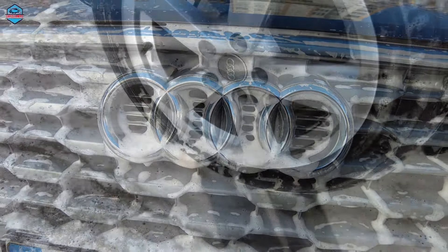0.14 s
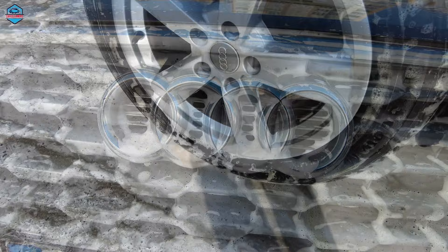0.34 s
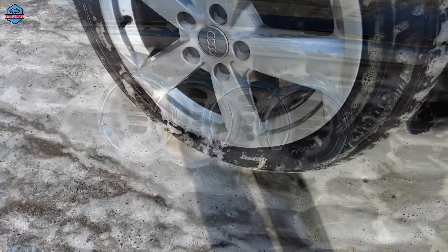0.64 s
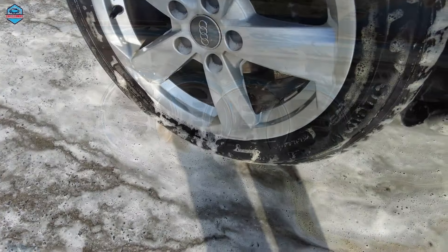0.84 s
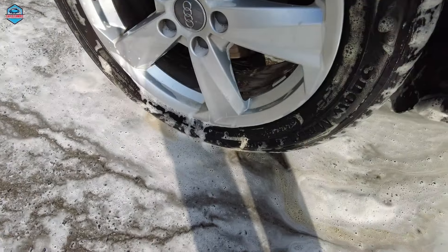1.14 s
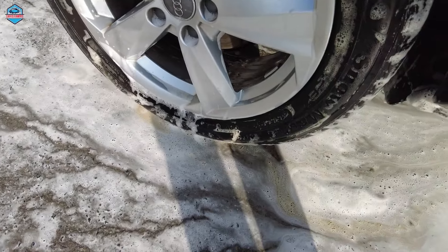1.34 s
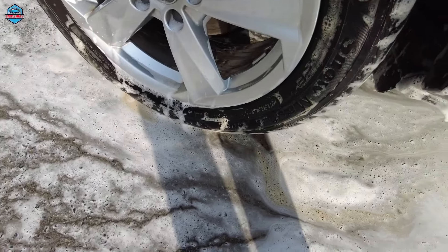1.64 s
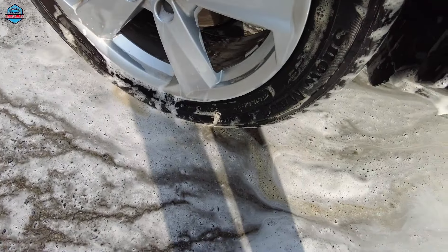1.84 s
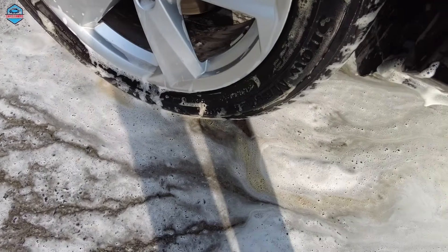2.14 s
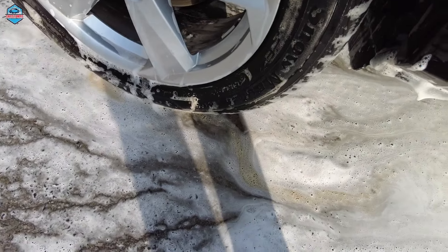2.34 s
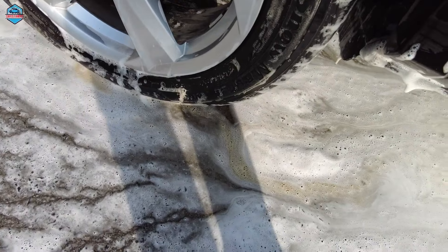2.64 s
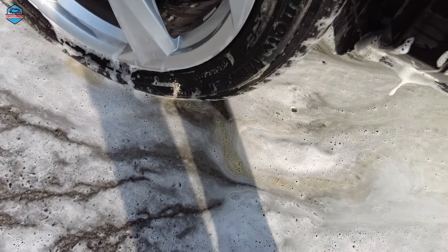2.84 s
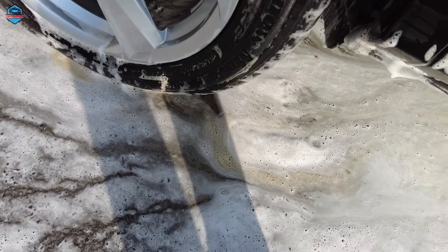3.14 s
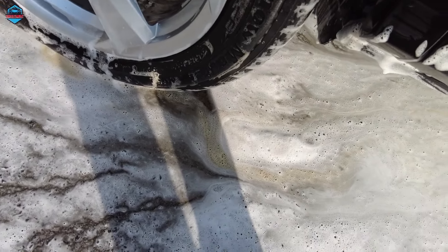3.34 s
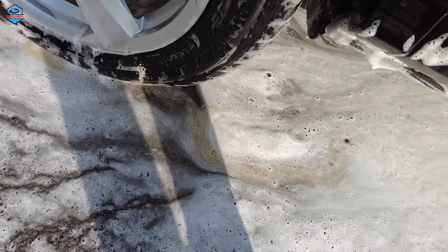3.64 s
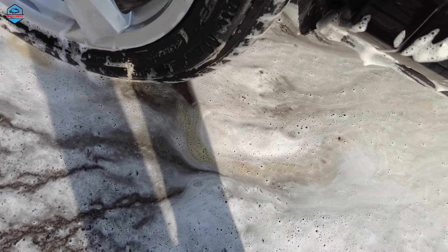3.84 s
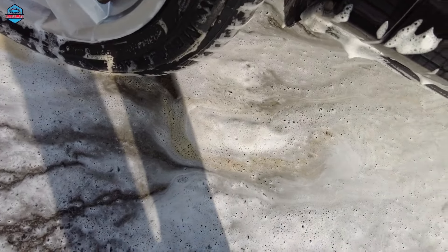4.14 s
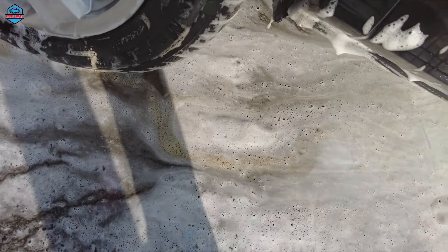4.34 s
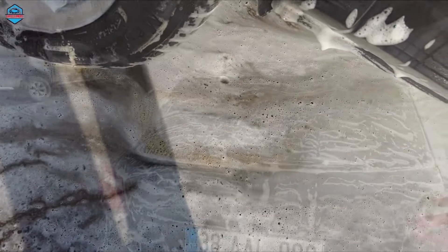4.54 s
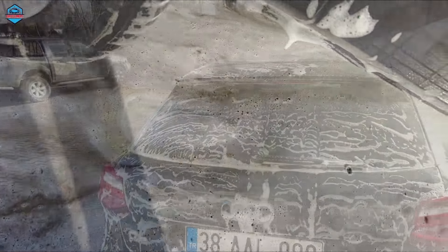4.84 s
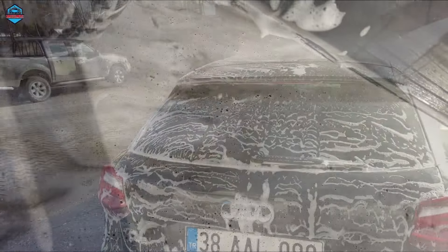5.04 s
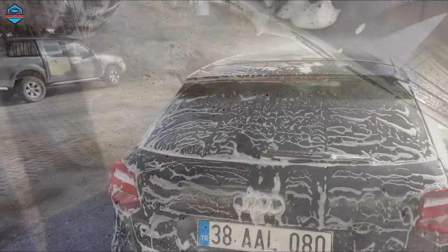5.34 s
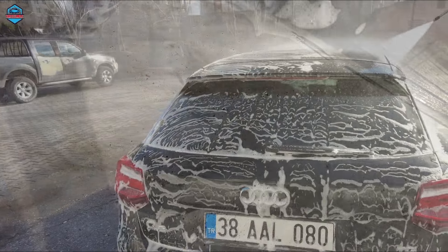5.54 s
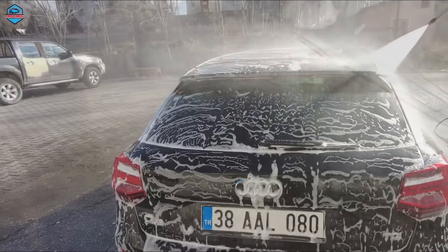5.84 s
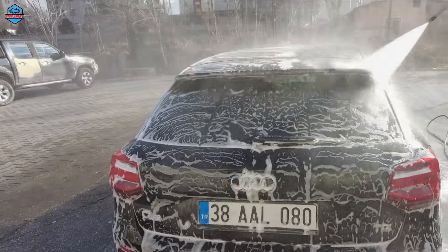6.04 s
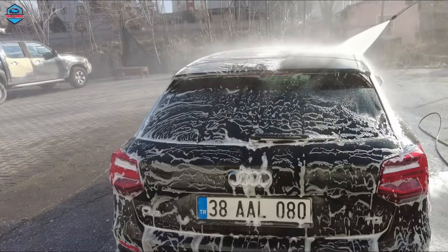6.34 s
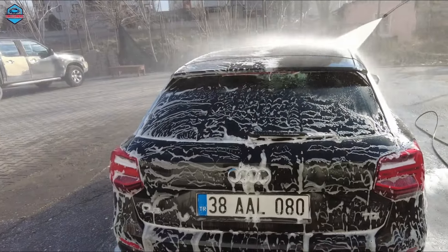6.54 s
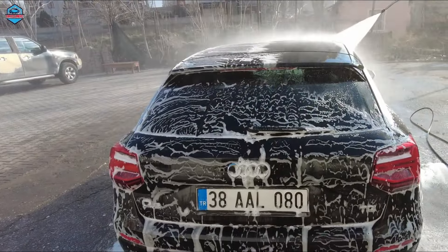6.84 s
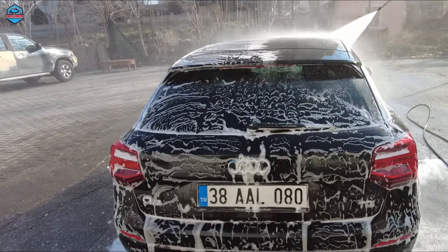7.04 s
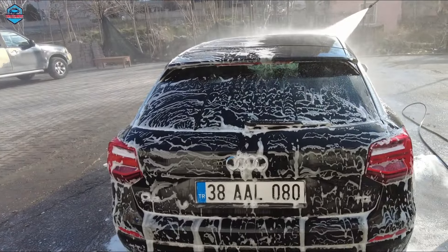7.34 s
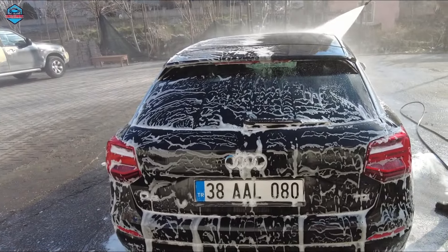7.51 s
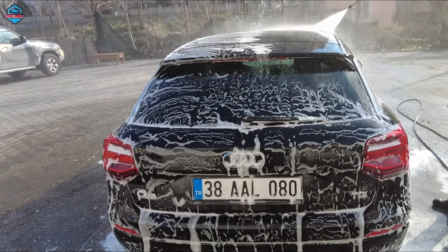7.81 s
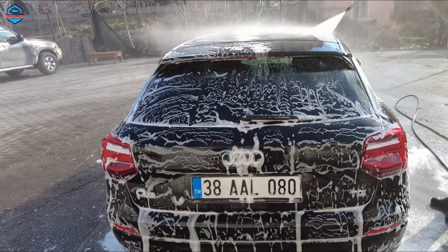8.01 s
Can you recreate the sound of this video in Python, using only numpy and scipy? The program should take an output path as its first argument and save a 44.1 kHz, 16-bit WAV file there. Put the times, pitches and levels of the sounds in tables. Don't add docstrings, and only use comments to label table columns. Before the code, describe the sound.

For the first 0.15 seconds there is only quiet open-yard air with a faint low rumble. After a tiny gap, at about 0.18, a close pressure-washer jet bursts in, growing to a loud, broad, slightly left-leaning hiss by 0.85, with low pump hum and throb beneath. Nearby surfaces give it a shifting hollow colour. A faint far motor sags in pitch from 1.4 to 2.1. The jet eases slightly until about 4, then swells strongly from 4.4 to 5; wind slaps thump softly near 0.9 and 4, and cluster around 4.8 to 5.15. At 5.17 it cuts off. From 5.21 a much quieter, thinner jet sounds farther away, right of centre. It rises to a short surge from 5.9 to 6.3, drumming on the roof panel, then drops to a soft steady spray. A light wind puff arrives near 7.9, with mistier treble at the end, about 8.2.

```python
import sys
import numpy as np
from scipy import signal
from scipy.io import wavfile
from scipy.ndimage import uniform_filter1d

SR = 44100
rng = np.random.default_rng(int(sys.argv[2]) if len(sys.argv) > 2 else 0)


def to_linear_factor(level_db):
    exponent = np.asarray(level_db, float) / 20
    return 10 ** exponent


def pcm_store(signal):
    levels = np.round(np.clip(np.atleast_2d(signal), -1, 1) * 32767)
    wavfile.write(sys.argv[1], SR, levels.astype(np.int16).T)


N = 360297
SIZE, HOP = 1024, 256
HZ = np.fft.rfftfreq(SIZE, 1 / SR)[:, None]
FRAME_S = np.arange(N // HOP + 5) * HOP / SR
TIME = np.arange(N) / SR
PUMP_HZ = 73.6

# [level/dB rms, follow/dB per dB of jet, turn/dB per unit of bearing]
PUMP_ORDERS = [
    [(-56, 0.5, -26), (-60, 2.5, 6), (-68.5, 2.5, 4)],
    [(-77, 1.5, 0.1), (-75.5, 0.6, -10), (-75, 1.6, -6)],
]
# [t/s, peak/dB, f/Hz]
SLAPS = [(.945, -32, 55), (3.987, -31, 45), (4.84, -29, 65), (4.875, -32, 100), (5.095, -29, 70),
         (5.13, -33, 110), (5.15, -30, 55), (6.05, -41, 80), (6.105, -39, 170), (6.17, -42, 80),
         (7.903, -49, 70), (8.018, -44, 60)]


def evened(x):
    return x / np.sqrt(np.mean(x ** 2) + 1e-20)


def read(points):
    f, value = np.transpose(points)
    return np.interp(np.log(HZ + 1), np.log(f + 1), value)


def curves(rows, t):
    s, *columns = np.transpose(rows)
    return [np.interp(t, s, c) for c in columns]


def dwell(t, s, half_s):
    return np.exp(-((t - s) / half_s) ** 2)


def bump(hz, width_hz):
    return np.exp(-((HZ - hz) / width_hz) ** 2)


def in_band(colour, lo_hz, hi_hz):
    gain = to_linear_factor(read(colour))
    inside = (HZ > lo_hz) & (HZ < hi_hz)
    return gain / np.sqrt(np.sum(gain[inside] ** 2))


def patches(bins, frames):
    field = rng.standard_normal((len(FRAME_S), len(HZ))).T
    field = uniform_filter1d(field, bins, axis=0)
    return evened(uniform_filter1d(field, frames, axis=1))


def ports(gain, same, turn=0, lean_db=0, paths=1):
    a, b, c, d = rng.standard_normal((len(FRAME_S), len(HZ), 4)).T
    same = np.clip(same, -1, 1)
    left = a + 1j * b
    right = same * left + np.sqrt(1 - same ** 2) * (c + 1j * d)
    right = right * np.exp(-1j * turn)
    both = np.array([left * to_linear_factor(lean_db / 2), right * to_linear_factor(-lean_db / 2)])
    z = np.sqrt(3 / 2) * gain * paths * both
    return signal.istft(z, nperseg=SIZE, noverlap=SIZE - HOP)[1][:, :N]


def yard():
    # [f/Hz, density/dB per Hz]
    yard_colour = [(15, -34), (25, -5), (49, -10.5), (135, -19), (207, -29), (237, -42), (318, -31.5),
                   (543, -35), (1420, -37.5), (2070, -48.5), (15000, -79.5)]
    # [f/Hz, likeness/0-1]
    yard_same = [(60, 1.0), (950, 0.98), (15000, 0.47)]
    return ports(in_band(yard_colour, 20, 16000) * to_linear_factor(-45.5), read(yard_same))


def housing():
    # [f/Hz, width/Hz, level/dB]
    resonances = [(1300, 65, 0.5), (1710, 140, 2.5), (2980, 300, 4.5), (3690, 63, -4), (4290, 270, 3),
                  (6130, 460, 1), (7030, 320, -2), (7840, 280, 4.5), (9340, 230, 6.5), (10950, 290, 3)]
    return sum(db * bump(hz, width_hz) for hz, width_hz, db in resonances)


def hollows(rows):
    return sum(db * dwell(FRAME_S, s, half_s) * bump(hz, 45 + .08 * hz) for s, half_s, hz, db in rows)


def echoes(mirrors, bearing, scale, small_hz, dull_hz):
    paths = 1
    mirror = scale * np.exp(-HZ / dull_hz) / (1 + (small_hz / (HZ + 1)) ** 2)
    for rows, skew_ms, turn_ms in mirrors:
        left_ms, strength = curves(rows, FRAME_S)
        right_ms = left_ms + skew_ms + turn_ms * (1 - bearing)
        delay_s = np.array([left_ms, right_ms])[:, None] / 1000
        paths = paths + strength * mirror * np.exp(-2j * np.pi * HZ * delay_s)
    return paths


def spray(rows, mirrors, jet, panel, lean, same, shape_db, panel_db, fizz_share, lean_db, patchy_db, sway_db,
          gain_db):
    # [t/s, half length/s, drumming level/dB, extra jet body/dB]
    passes = [(1.4, 0.26, -42.5, 1), (3.534, 0.29, -45, -0.5), (4.03, 0.2, -43.5, -1),
              (5.1, 0.072, -37.5, 1), (5.92, 0.046, -40.5, -1.5), (6.1, .06, -40, 3.5),
              (6.123, 0.29, -40, 2), (6.324, .045, -39.5, 0.1), (8.145, 0.065, -48.5, 2.5)]
    # [f/Hz, level/dB]
    boom_colour = [(60, -53), (110, -11), (150, 1.5), (280, 0.5), (380, -28)]
    # [f/Hz, phase/radians]
    port_turn = [(80, 0.18), (400, 1.6), (1100, 3.8), (1290, .4), (2000, 0.95), (4000, 2.64), (15000, 2.8)]
    level_db, mist_db, bearing = curves(rows, FRAME_S)

    body_db = sum(db * dwell(FRAME_S, s, half_s) for s, half_s, _, db in passes)
    mist_db = mist_db - mist_db.mean()
    fizz = read([(2000, 0), (3000, 1), (6000, 1), (8000, 0)]) * (fizz_share * mist_db - body_db)
    mist = read([(6000, 0), (8000, 1)]) * (mist_db - body_db)
    hiss = in_band(jet, 1000, 2740) * to_linear_factor(level_db + body_db + fizz + mist)

    pass_power = sum(to_linear_factor(db) ** 2 * dwell(FRAME_S, s, half_s) ** 2 for s, half_s, db, _ in passes)
    beat = np.sqrt(to_linear_factor(level_db + panel_db) ** 2 + pass_power)
    gust = np.max([dwell(FRAME_S, s, .06) for s, _, _ in SLAPS], axis=0)
    boom_db = -13.5 + 11 * gust
    drum = np.hypot(in_band(panel, 320, 900), in_band(boom_colour, 100, 330) * to_linear_factor(boom_db - 2.5))
    drum = drum * beat * to_linear_factor(1.53 * patches(bins=5, frames=8))

    patchy = patchy_db * patches(bins=5, frames=70)
    sway = sway_db * patches(bins=300, frames=14)
    gain = np.hypot(hiss, drum) * to_linear_factor(shape_db + patchy + sway)
    paths = echoes(mirrors, bearing, scale=1.5, small_hz=550, dull_hz=6000)
    balance_db = read(lean) + lean_db * (bearing - .5)
    sound = ports(gain, read(same), bearing * read(port_turn), balance_db, paths)
    throb = 1 + .02 * np.sin(2 * np.pi * PUMP_HZ * TIME)
    return to_linear_factor(gain_db) * sound * throb


def pump(orders, rows):
    held_s = np.clip(TIME, rows[0][0], rows[-1][0])
    level_db, _, bearing = (c - c.mean() for c in curves(rows, held_s))
    waver = evened(uniform_filter1d(rng.standard_normal(len(FRAME_S)), size=60))
    shaft_hz = PUMP_HZ + .25 * np.interp(TIME, FRAME_S, waver)
    turns = np.cumsum(shaft_hz) / SR
    hum = 0
    for order, (db, follow, turn_db) in enumerate(orders, 1):
        loudness = to_linear_factor(db + follow * level_db + turn_db * bearing)
        hum = hum + np.sqrt(2) * loudness * np.sin(2 * np.pi * order * turns)
    return hum


def near_lance():
    # [t/s, jet level/dB, fine mist/dB, bearing/-1 right to 1 left]
    near_path = [(.18, -43, 0.5, 0.93), (.5, -39, 0.5, 0.81), (.85, -35.5, -2, 0.95), (1.25, -35, -2, 0.72),
                 (1.6, -37, -1.4, 0.67), (2.5, -37, -2, 0.6), (3.25, -39, 1.5, 0.57),
                 (3.95, -39, -0.7, 0.5), (4.5, -32.5, 0.3, 0.31), (4.95, -33, 0.4, 0.42),
                 (5.17, -37, -0.5, 0.33)]
    # [f/Hz, density/dB per Hz]
    near_jet = [(600, -16.5), (850, -6), (1250, -1), (2400, -5), (4500, -5), (7000, -9), (9000, -10),
                (12300, -10.5), (14500, -15.5), (16000, -10)]
    # [f/Hz, density/dB per Hz]
    near_panel = [(200, -49), (290, -10.5), (370, -3), (610, -0.5), (850, 2), (1000, -1.5), (1300, -17)]
    # [f/Hz, level/dB]
    near_lean = [(60, -5), (110, -1), (200, 1), (380, 1), (700, 3.5), (1290, 1.5), (2380, 1.5), (4400, 2),
                 (8120, 7), (15000, 1.5)]
    # [f/Hz, likeness/0-1]
    near_same = [(150, .99), (550, .95), (800, .75), (1180, .55), (1300, .93), (2200, .78), (3000, .6),
                 (3600, .3), (8000, .25), (15000, .25)]
    # [t/s, half length/s, f/Hz, level/dB]
    near_hollows = [(0.498, 0.61, 780, -8), (.95, 0.23, 270, -4.5), (1.0, .15, 1150, 2),
                    (3.8, 0.37, 3180, -2), (4.65, .2, 2200, -0.5), (1.5, .35, 1100, -1),
                    (1.8, 0.16, 1360, 3), (2.0, 0.27, 1140, -3.5), (2.306, 0.4, 1410, -0.5),
                    (3.1, .3, 220, -3.5), (4.272, .17, 235, 7), (2.554, 0.72, 900, -8),
                    (2.657, 0.36, 6040, 7), (3.9, .2, 1200, -3.5), (4.05, 0.18, 910, 1.5),
                    (4.354, 0.072, 3350, 6.5), (4.6, 0.52, 1110, 6), (4.9, 0.42, 880, -11),
                    (4.9, 0.71, 4600, 3), (4.85, 0.29, 1510, 1.5), (2.6, 0.69, 590, 2.5),
                    (5.05, 0.14, 1300, 1.5), (5.123, 0.082, 390, 8.5), (5.13, 0.046, 735, -7)]
    # [t/s, delay/ms, strength/0-1]
    ground_echo = [(.5, 1.22, .4), (.85, 1.36, .24), (1.75, 2.08, .23), (2.7, 2.11, .23), (3.0, 2.3, .24),
                   (4.2, 2.55, .22), (4.45, 2.72, .26), (4.8, 2.55, .26), (5.19, 2.57, .2)]
    # [t/s, delay/ms, strength/0-1]
    wheel_echo = [(1.0, 1.91, .19), (1.3, 1.7, 0), (1.7, 1.62, .2), (2.8, 1.57, .13), (4.2, 1.6, .14),
                  (4.5, 1.5, 0), (4.85, 1.5, .1)]
    # [t/s, delay/ms, strength/0-1]
    sill_echo = [(.18, 3.0, .17), (1.2, 3.46, .18), (1.9, 3.58, .2), (2.7, 3.55, .08), (3.0, 3.4, 0),
                 (4.5, 3.0, 0), (4.85, 2.99, .16)]
    # [path, from full left/ms, turning right/ms per unit of bearing]
    near_mirrors = [(ground_echo, 0, .23), (wheel_echo, -.04, .02), (sill_echo, -.08, .25)]
    shape_db = hollows(near_hollows) + .5 * housing()
    jet = spray(near_path, near_mirrors, near_jet, near_panel, near_lean, near_same, shape_db, panel_db=-3.5,
                fizz_share=0.82, lean_db=3.0, patchy_db=1.64, sway_db=0.6, gain_db=0.5)
    return jet + pump(PUMP_ORDERS[0], near_path)


def wind():
    # [t/s, level/dB]
    wind_level = [
        (0.18, -54.5),
        (0.65, -53.5),
        (5.03, -53.5),
        (5.27, -71),
        (6.1, -68),
        (6.5, -69),
        (7.75, -67.5),
        (7.93, -56),
        (8.17, -59),
    ]
    # [f/Hz, level/dB]
    wind_colour = [(15, 0.5), (35, -3), (55, -2), (90, -11), (130, -8.5), (200, -31), (300, -60)]
    level_db = curves(wind_level, FRAME_S)[0] - 1.5 + 1.8 * patches(bins=40, frames=6)
    return ports(in_band(wind_colour, 20, 130) * to_linear_factor(level_db), 0.99)


def slaps():
    pressure = 0
    for s, db, hz in SLAPS:
        swing = np.cos(2 * np.pi * hz * (TIME - s))
        pressure = pressure - to_linear_factor(db) * dwell(TIME, s, .4 / hz) * swing
    return pressure


def engine():
    # [t/s, f/Hz, level/dB]
    sag = [
        (1.3, 126, -75),
        (1.5, 121, -57),
        (1.95, 116, -58),
        (2.15, 115, -90),
    ]
    hz, db = curves(sag, TIME)
    return to_linear_factor(db) * (TIME > sag[0][0]) * np.sin(2 * np.pi * np.cumsum(hz) / SR)


def far_lance():
    # [t/s, jet level/dB, fine mist/dB, bearing/-1 right to 1 left]
    far_path = [
        (5.21, -56, 1.5, -.57),
        (5.45, -54.5, -1.5, -0.46),
        (6.0, -46.5, -1.3, -0.32),
        (6.25, -46, -3, -0.24),
        (6.42, -50.5, -1.1, -0.32),
        (7.6, -54, -2.9, -0.4),
        (8.17, -53.5, 4.5, -0.22),
    ]
    # [f/Hz, density/dB per Hz]
    far_jet = [(600, -19), (850, -13.5), (1270, -4), (2000, -8.5), (4500, -8.5), (7000, -10.5), (9500, -11),
               (11300, -14), (13000, -16.5), (16000, -18)]
    # [f/Hz, density/dB per Hz]
    far_panel = [(200, -37), (300, -14), (370, -4), (520, -3), (700, -3.5), (950, -6), (1300, -20.5),
                 (1700, -27)]
    # [f/Hz, level/dB]
    far_lean = [(60, 0.0), (180, -1.5), (550, 0), (1650, 0.5), (4970, -2.5), (15000, -5)]
    # [f/Hz, likeness/0-1]
    far_same = [(150, .99), (800, .9), (1180, .65), (1300, .96), (2900, .82), (3700, .3), (4500, .65),
                (6000, .25), (7800, .55), (8600, .25), (9500, .65), (15000, .3)]
    # [t/s, half length/s, f/Hz, level/dB]
    far_hollows = [(5.6, 0.32, 1080, -3), (5.92, 0.066, 500, 4), (6.32, 0.056, 530, 3),
                   (5.5, .4, 2150, 2.5), (7, 0.43, 8800, 3.5)]
    # [t/s, delay/ms, strength/0-1]
    far_echo = [(5.2, 1.71, .2), (5.8, 1.77, .17), (6.4, 1.71, .22), (8.17, 1.78, .21)]
    # [path, from full left/ms, turning right/ms per unit of bearing]
    far_mirrors = [(far_echo, .01, 0)]
    shape_db = 0.7 * housing() + hollows(far_hollows)
    jet = spray(far_path, far_mirrors, far_jet, far_panel, far_lean, far_same, shape_db, panel_db=-1.5,
                fizz_share=1.0, lean_db=-2.0, patchy_db=1.0, sway_db=.5, gain_db=-0.02)
    return jet + pump(PUMP_ORDERS[1], far_path)


def scene():
    # [t/s, gain/dB]
    yard_cut = [(.1445, 0), (.1465, -45), (.163, -46), (.165, -100)]
    # [t/s, gain/dB]
    near_cut = [(.174, -100), (.176, -30), (.1785, 0), (5.1695, 0), (5.173, -25), (5.18, -40), (5.19, -100)]
    # [t/s, gain/dB]
    far_cut = [(5.205, -100), (5.2095, -35), (5.2112, 0)]

    def fade(rows):
        return to_linear_factor(curves(rows, TIME)[0])

    air = wind() + slaps() + engine()
    near = near_lance() + air
    far = far_lance() + air
    return yard() * fade(yard_cut) + near * fade(near_cut) + far * fade(far_cut)


def roll_off(x):
    return signal.sosfilt(signal.butter(12, 16950, fs=SR, output="sos"), x)


def record(dry):
    edge = signal.firwin(1023, 15740, window=("kaiser", 10), fs=SR)
    mix = signal.oaconvolve(dry, edge[None], "same")
    return roll_off(mix)


dry = scene()
out = record(dry)
pcm_store(out)
```